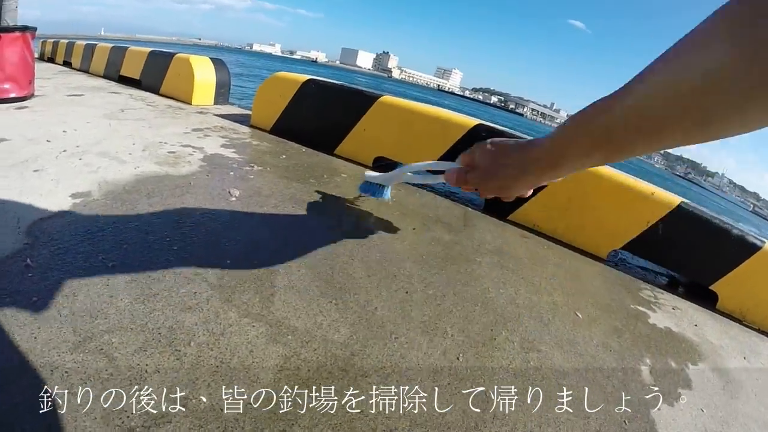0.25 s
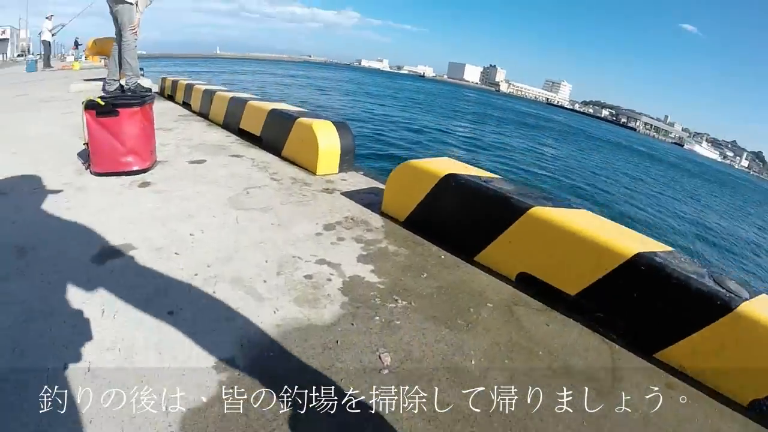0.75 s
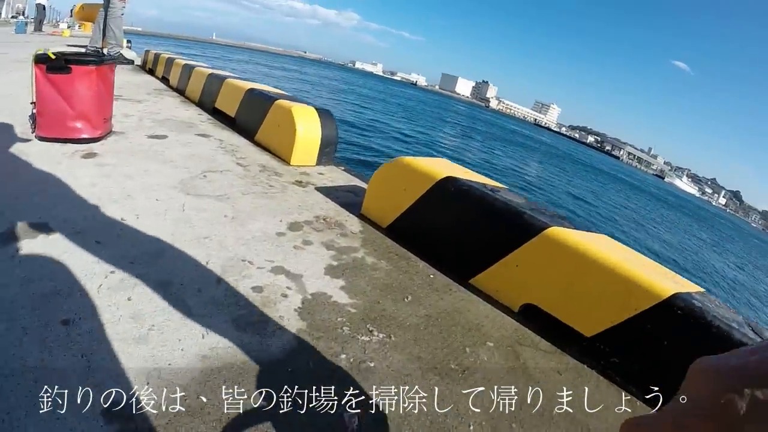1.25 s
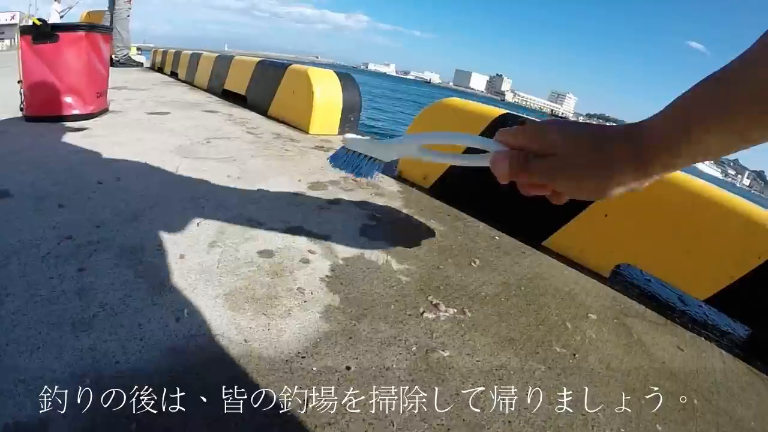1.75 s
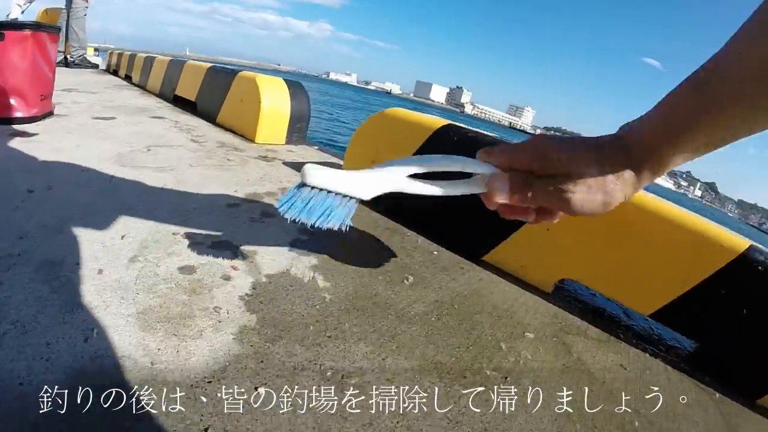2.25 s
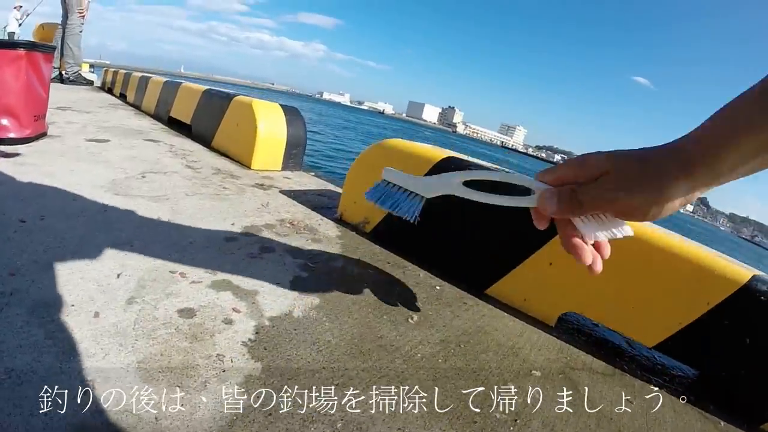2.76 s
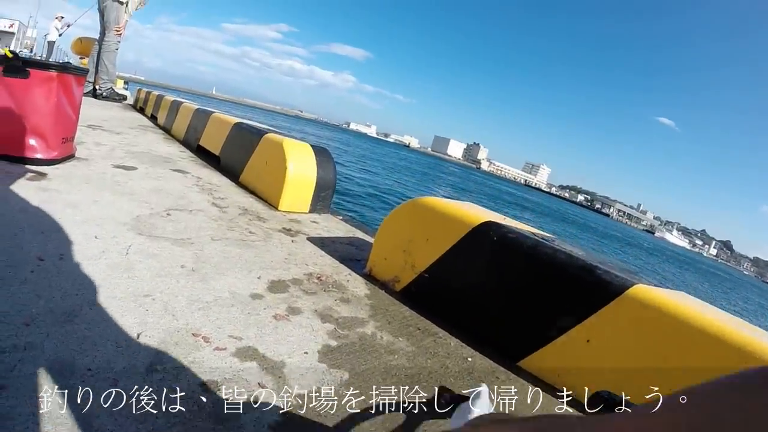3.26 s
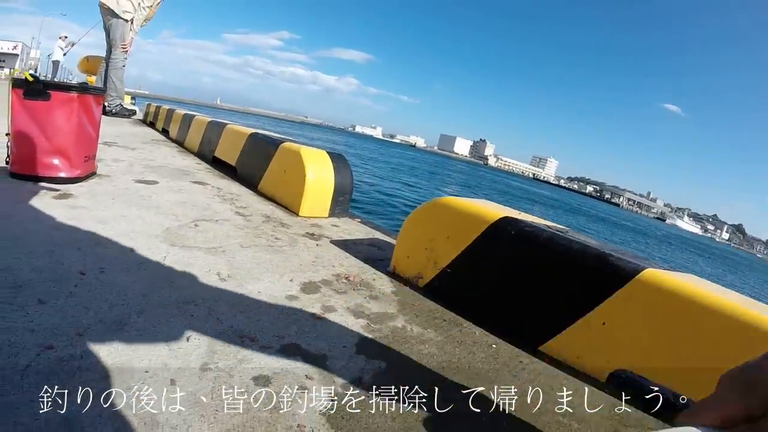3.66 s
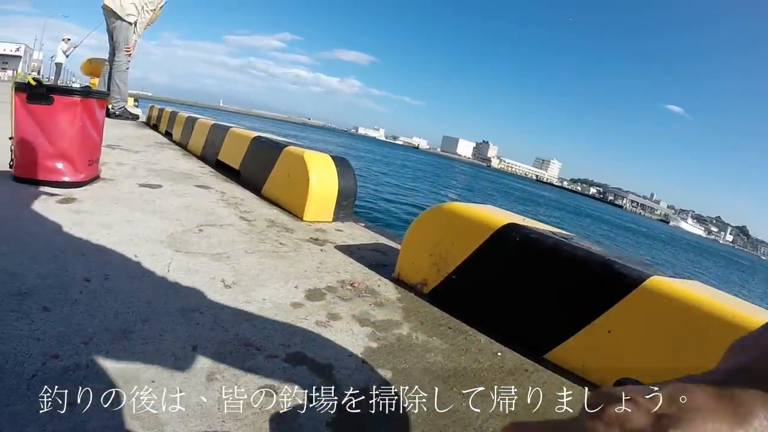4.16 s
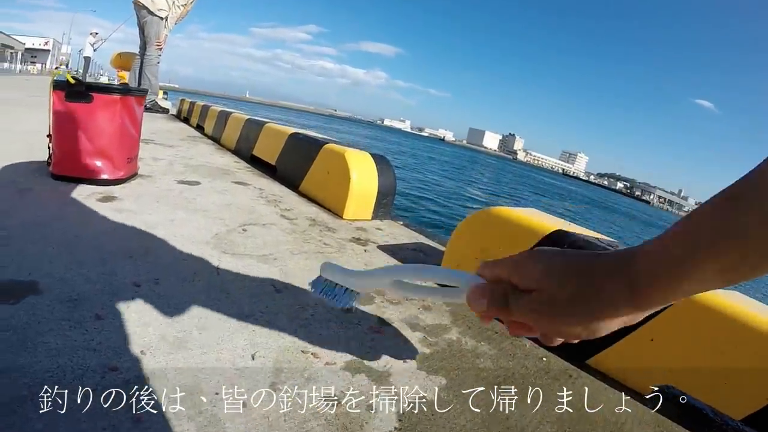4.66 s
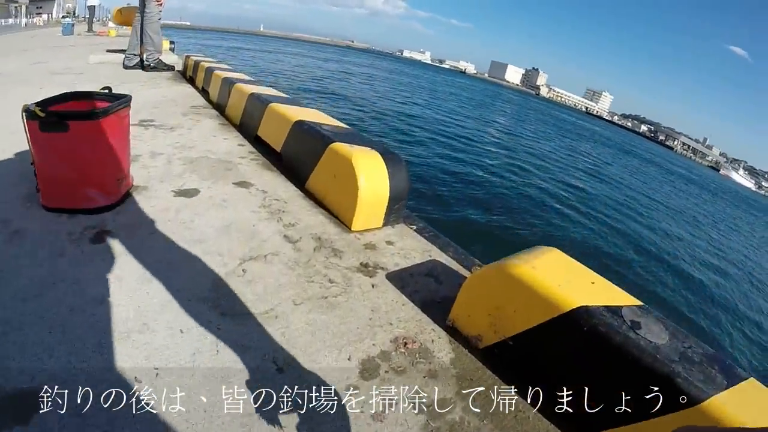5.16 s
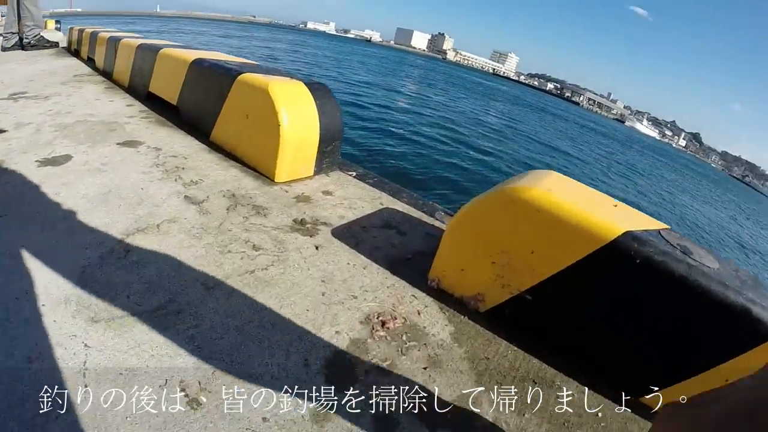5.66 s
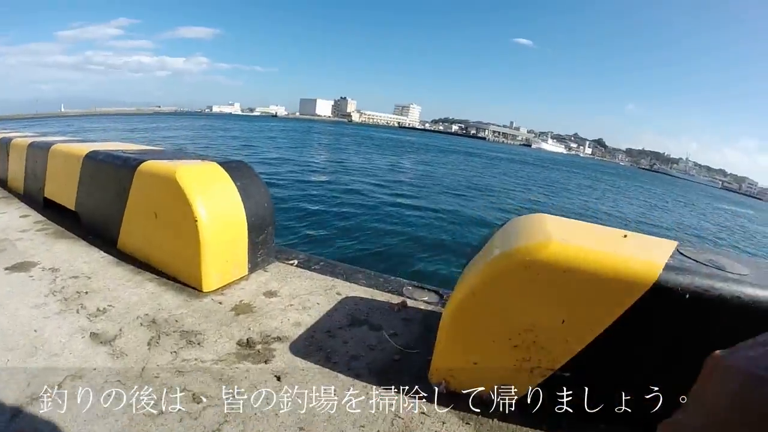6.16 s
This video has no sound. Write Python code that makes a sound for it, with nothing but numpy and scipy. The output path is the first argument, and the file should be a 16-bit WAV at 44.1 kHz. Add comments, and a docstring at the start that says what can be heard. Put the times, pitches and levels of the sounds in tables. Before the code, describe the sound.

Brief, bristly sweeps of a hand brush on concrete come at uneven intervals, with light taps and a quiet harbour breeze.

```python
"""Hand brush on wet concrete

A small stiff brush is swept eight times, close by, on a quiet quay. Thousands of bristle tips catch on
the grit and flick free, ringing in the tufts and the plastic head. Light taps and faint grazes fall
around the strokes, over a steady outdoor hiss and soft puffs of wind on the microphone."""
import sys
import numpy as np
from scipy import signal
from scipy.fft import rfft, irfft, next_fast_len
from scipy.io import wavfile

SR = 44100
rng = np.random.default_rng(int(sys.argv[2]) if len(sys.argv) > 2 else 0)


def int16_out(signal):
    """Quantize to a 16-bit WAV file."""
    q = np.round(np.clip(np.atleast_2d(signal).T, -1, 1) * 32767)
    wavfile.write(sys.argv[1], SR, q.astype(np.int16))


N = 282681
TIME_S = np.arange(N) / SR
FFT_LEN = 2 * next_fast_len(N // 2 + 1, real=True)
FREQ_HZ = np.fft.rfftfreq(FFT_LEN, 1 / SR)


def brush(clump_db=1.0, head_drift_db=-9.5, sizzle_drift_db=4):
    """Bristle flicks ring the head, tufts and tips as each push swells and lifts off."""
    # Pushes; a light drag may run into a harder one: (touch [s], rise [s], release [s], level [dB],
    # swell [exponent], ease [exponent], head, bent tufts, tips, sizzle [each dB re level],
    # drift of the tips as the brush rolls [dB per push])
    pushes = [ (0.172, 0.073, 0.058, -25.5, 1.3, 2.5, -15, -4, -8.5, -11.5, 3),
              (1.457, 0.08, 0.13, -45.5, 1.2, 1.5, -6.5, -2, -2, -10, -4),
              (1.535, 0.097, 0.058, -29, 1.55, 2.8, -10, -1, -7.5, -11, 6),
              (2.006, 0.1, 0.059, -26.5, 2.2, 2.1, -15, -4, -10, -13.5, 11),
              (2.498, 0.065, 0.069, -25, 1.32, 4.3, -13, -6, -7.5, -12.5, 1),
              (3.178, 0.073, .130, -44.5, 0.73, 1.8, -10, -7, -16, -17, 0),
              (3.285, .052, .035, -40, 1.3, 2.8, -8.5, -1, -13, -18.5, 11),
              (3.772, 0.18, .038, -26.5, 3.03, 3.1, -13.5, -5, -9, -13.5, 9),
              (4.366, .074, 0.085, -31.5, 1.53, 2.17, -12, -4.5, -4, -10.5, -11),
              (5.690, 0.17, 0.1, -32.0, 2.3, 2.2, -9.5, -4.5, -7, -11.5, -6), ]
    # Resonances: (centre [Hz], width [Hz], relative level [dB])
    tuft_modes = [(5690, 400, -1.5), (6180, 360, 0), (6750, 840, -3.5), (7070, 2200, -14.5)]  # tufts springing upright
    head_modes = [(1316, 320, -14.5), (1770, 380, -29), (2520, 390, 2), (2960, 130, -2.5), (3173, 214, 0)]  # plastic head
    bent_modes = [(4133, 244, -3.5), (4746, 450, 3)]  # tufts bent flat
    tip_modes = [(8400, 900, -7.5), (9400, 950, -0.5), (10670, 580, -3), (11300, 660, -2.5)]  # bristle tips
    sizzle_modes = [(12100, 650, -3), (13400, 740, -4), (15000, 1000, -12)]  # finest grit
    clumps = gain_of(clump_db * wander(rate_hz=200))  # whole tufts catch and let go together
    jolts = gain_of(-18) * flicks(per_s=900, spread_db=-1.0)  # coarse grains shake the whole brush
    tufts, head, bent, tips, sizzle = (
        ringing(modes, jolts, clumps)
        for modes in (tuft_modes, head_modes, bent_modes, tip_modes, sizzle_modes))
    out = np.zeros(N)
    for touch_s, rise_s, release_s, level_db, swell, ease, *balance_db in pushes:
        head_db, bent_db, tips_db, sizzle_db, roll_db = balance_db
        on = (TIME_S > touch_s) & (TIME_S < touch_s + rise_s + release_s)
        t = TIME_S[on] - touch_s - rise_s
        press = pressure(t, rise_s, release_s, swell, ease)
        travel = t / (rise_s + release_s)  # share of the push, 0 at the crest
        # Exponents below 1: the tips already sound at a light touch.
        out[on] += gain_of(level_db) * (
            press * tufts[on]
            + press ** 0.97 * gain_of(head_db + head_drift_db * travel) * head[on]
            + press * gain_of(bent_db) * bent[on]
            + press ** 0.89 * gain_of(tips_db + roll_db * travel) * tips[on]
            + press ** 0.93 * gain_of(sizzle_db + sizzle_drift_db * travel) * sizzle[on])
    return out


def pressure(t, rise_s, release_s, swell, ease):
    """Hand pressure, 0 to 1, crest at t = 0. Higher swell digs in later; higher ease lets go sooner."""
    rise = np.clip(1 + t / rise_s, 0, 1)
    fall = np.clip(t / release_s, 0, 1)
    return rise ** swell * (1 - fall ** 2) ** ease


def flicks(per_s, spread_db):
    """Bristle tips slip off grains of grit: dense clicks of uneven size."""
    size = gain_of(spread_db * np.minimum(rng.exponential(1, N), 4))
    sign = rng.choice([-1, 1], N)
    slips = rng.random(N) < per_s / SR
    return unit_rms(size * sign * slips)


def ringing(modes, jolts, clumps, shift_db=2.0):
    """Each resonance has its own bristles; the one that leads keeps changing as they bend."""
    out = np.zeros(N)
    for hz, width_hz, db in modes:
        drive = (flicks(per_s=9000, spread_db=1.5) + jolts) * clumps
        ring = coloured(drive, resonance(hz, width_hz))
        out += ring * np.sqrt(width_hz) * gain_of(db + shift_db * wander(rate_hz=22))
    return unit_rms(out)


def taps(rise_s=0.00026):
    """Handling taps: brief, heavily damped noise bursts, each around one pitch."""
    # Taps and ticks: (time [s], peak [dB], centre [Hz], width [Hz], t60 [s])
    hits = [(1.010, -44, 1400, 1100, 0.024), (1.028, -42, 1500, 1800, .03), (1.278, -35, 1810, 900, 0.04),
            (2.495, -38, 2700, 900, 0.015), (2.4954, -32.5, 5800, 5000, 0.036),
            (3.09, -53, 10000, 6000, .03), (3.3215, -31, 6000, 5000, 0.011),
            (3.449, -58, 11200, 2200, .015), (4.378, -37, 8500, 3500, 0.033), (4.73, -57, 7000, 5000, .025),
            (5.24, -41.5, 2480, 700, 0.033), (5.379, -36, 3100, 2600, 0.05),
            (5.382, -49, 6500, 4800, 0.046), (5.59, -42, 2530, 600, 0.042), (5.591, -52, 9000, 7000, .04),
            (5.708, -37.5, 2570, 800, 0.014), (6.168, -48, 2500, 1200, .025)]
    out = np.zeros(N)
    t = np.arange(4096) / SR
    bins_hz = np.fft.rfftfreq(len(t), 1 / SR)
    for at_s, peak_db, hz, width_hz, t60_s in hits:
        ring = irfft(rfft(rng.standard_normal(len(t))) * resonance(hz, width_hz, bins_hz))
        tap = ring * gain_of(-60 * t / t60_s) * (1 - np.exp(-t / rise_s))
        add(out, at_s, gain_of(peak_db) * tap / abs(tap).max())
    return out


def graze():
    """Only the very tips touch: a thin rustle that swells and fades."""
    # Grazing contacts: (time [s], level [dB], half length [s])
    contacts = [(3.15, -69, .025), (3.435, -73, .045), (5.604, -77, .015), (6.294, -64, 0.011),
                (6.32, -68, 0.017)]
    rustle = coloured(flicks(per_s=2500, spread_db=4), resonance(hz=10200, width_hz=3600))
    return rustle * sum(gain_of(db) * bump(at_s, half_s) for at_s, db, half_s in contacts)


def wind(rumble_hz=55, gust_db=0.5):
    """Lumpy rumble at the microphone; a few eddies rock the pressure to and fro."""
    # Breeze strength: (time [s], rumble level [dB])
    breeze = [(0, -58), (.7, -52), (1.8, -52.5), (3.0, -60), (3.7, -63), (4.9, -54), (5.4, -58.5),
              (6.4, -54)]
    # Eddies: (time [s], envelope peak [dB], length [s], frequency [Hz])
    puffs = [(0.606, -38, 0.045, 53), (0.65, -32, 0.077, 20), (2.73, -56, .05, 30), (4.051, -40, 0.011, 96),
             (4.917, -41, 0.095, 19.6), (6.318, -44.5, 0.04, 52)]
    breeze_db = np.interp(TIME_S, *np.transpose(breeze))
    band = FREQ_HZ / (FREQ_HZ + 12) / (1 + (FREQ_HZ / rumble_hz) ** 2)
    rumble = coloured(rng.standard_normal(N), band)
    out = rumble * gain_of(breeze_db + gust_db * wander(rate_hz=6.8))
    for at_s, peak_db, length_s, hz in puffs:
        swing = np.sin(2 * np.pi * (hz * (TIME_S - at_s) + rng.random()))
        out += gain_of(peak_db) * swing * bump(at_s, length_s / 2)
    return out


def air(wash_db=-54.5, hiss_db=-55.5, fade_db_per_s=0.1, flutter_db=0.5):
    """Low harbour wash under a steady, slightly hollow hiss."""
    # Outdoor noise spectra: (frequency [Hz], relative density [dB])
    wash_spectrum = [(12, -9), (20, -2.5), (118, -14.5), (180, -13.5), (210, -16), (315, -17.5),
                     (707, -23.5), (793, -24.5), (857, -25.5), (2000, -32), (2600, -63), (4400, -120)]
    hiss_spectrum = [(1500, -8.5), (2050, -9), (2350, 0), (3150, -2.5), (3600, -11.5), (4200, -4.5),
                     (4500, -7), (4780, 0), (5100, -7.5), (5600, -3.5), (6300, -9.5), (7300, -15.5),
                     (8800, -19.5), (10200, -25), (11200, -23.5), (12500, -29.5), (15000, -32)]
    wash = shaped_noise(wash_spectrum) * gain_of(wash_db)
    hiss = shaped_noise(hiss_spectrum)
    return wash + hiss * gain_of(hiss_db - fade_db_per_s * TIME_S + flutter_db * wander(rate_hz=20))


def gain_of(db):
    """Decibels to amplitude."""
    return 10 ** (np.asarray(db) / 20)


def unit_rms(x):
    """Scale to rms 1."""
    return x / np.sqrt(np.mean(x ** 2) + 1e-20)


def resonance(hz, width_hz, bins_hz=FREQ_HZ):
    """Gain per bin of one resonance."""
    return 1 / (1 + 2 * ((bins_hz - hz) / width_hz) ** 2)


def coloured(x, gain):
    """Filter by a gain per bin; rms 1."""
    return unit_rms(irfft(rfft(x, FFT_LEN) * gain, FFT_LEN)[:N])


def shaped_noise(spectrum):
    """Noise following (frequency [Hz], relative density [dB]) points; rms 1."""
    hz, db = np.transpose(spectrum)
    gain = gain_of(np.interp(np.log(FREQ_HZ + 1), np.log(hz), db))
    return coloured(rng.standard_normal(N), gain)


def wander(rate_hz):
    """Random drift up to about rate_hz; rms 1."""
    knots = rng.standard_normal(N // 32)
    return unit_rms(np.interp(2 * rate_hz * TIME_S, np.arange(len(knots)), knots))


def bump(at_s, half_s):
    """Gaussian envelope, 1/e at half_s from its peak."""
    return np.exp(-((TIME_S - at_s) / half_s) ** 2)


def add(mix, at_s, sound):
    """Mix a sound in at at_s."""
    part = mix[max(round(at_s * SR), 0):][:len(sound)]
    part += sound[:len(part)]


def scene():
    """Open air, no echo; mono."""
    return (brush() + graze() + taps() + wind() + air())[None]


def record(dry):
    """Steep low-pass band limit."""
    edge_hz = 15450
    lowpass = signal.firwin(511, edge_hz, window=("kaiser", 9), fs=SR)
    return signal.oaconvolve(dry, lowpass[None], "same")


dry = scene()
out = record(dry)
int16_out(out)
```